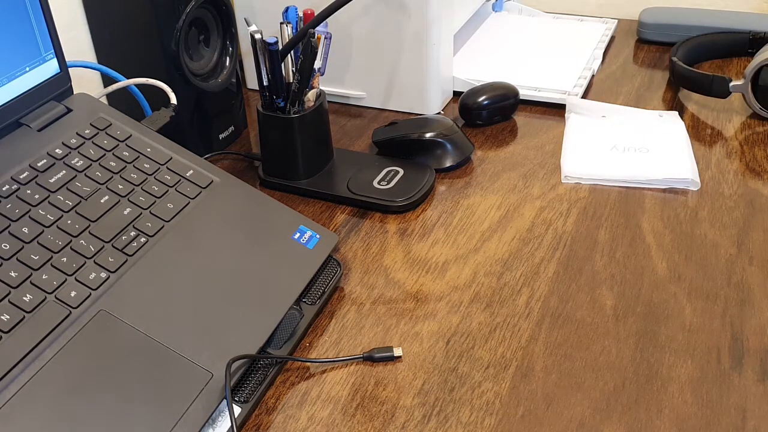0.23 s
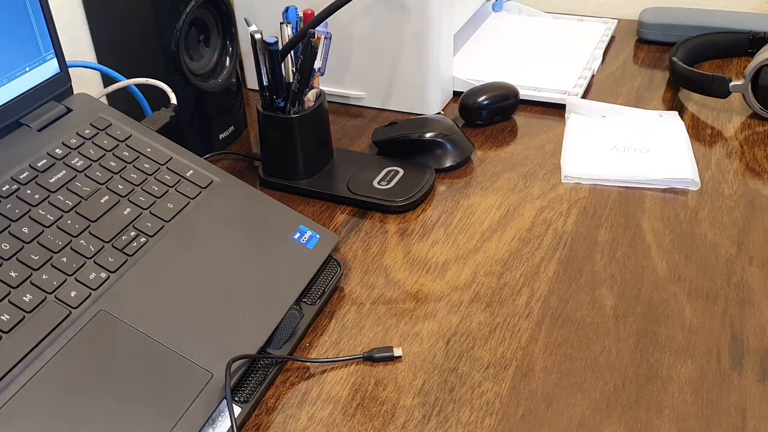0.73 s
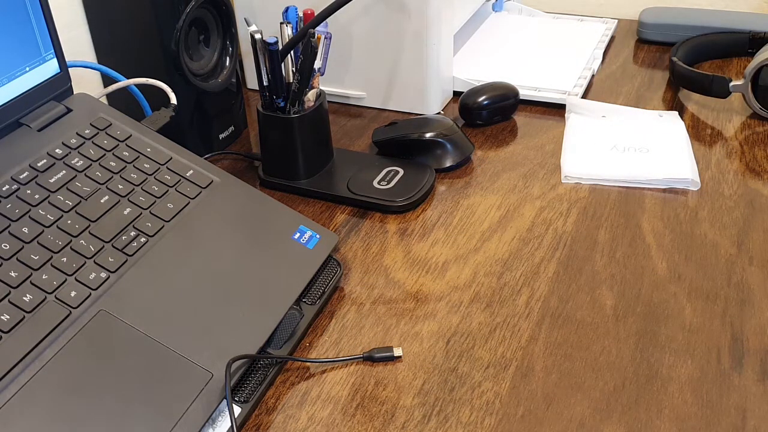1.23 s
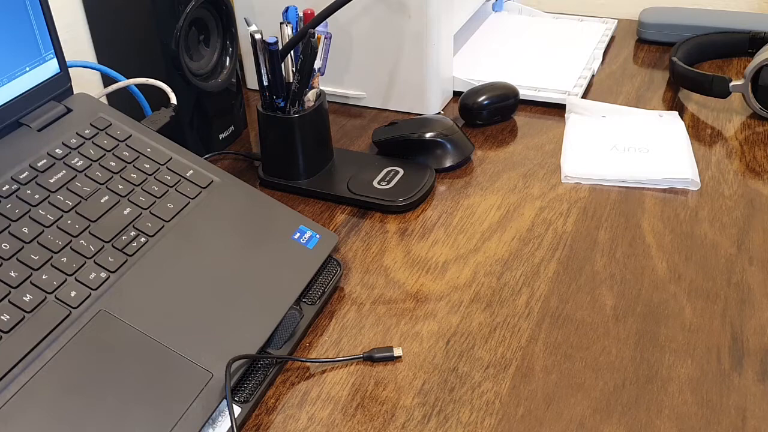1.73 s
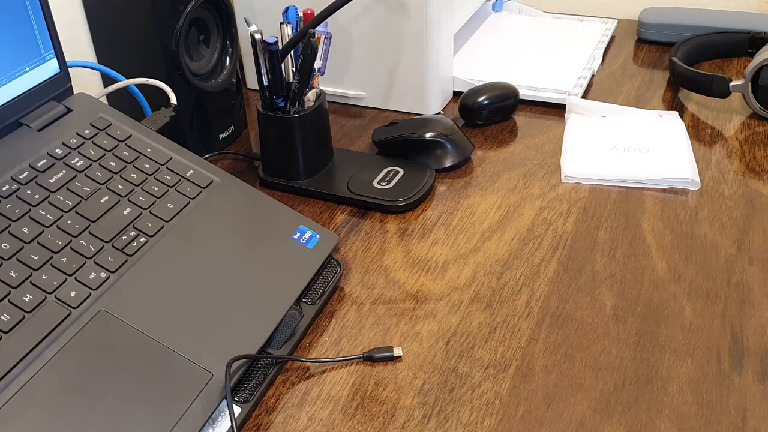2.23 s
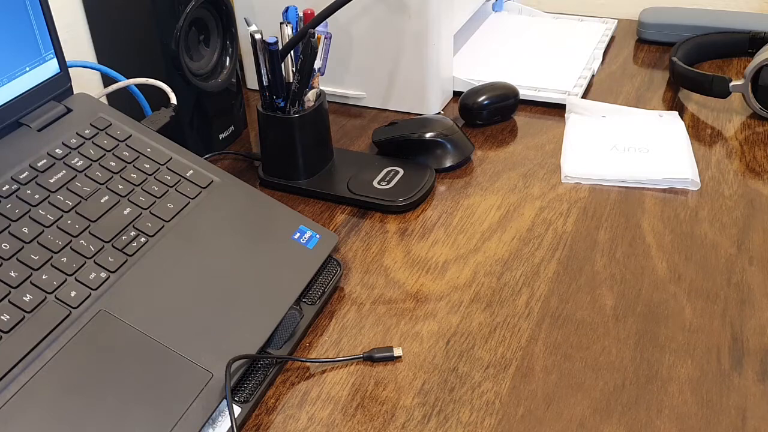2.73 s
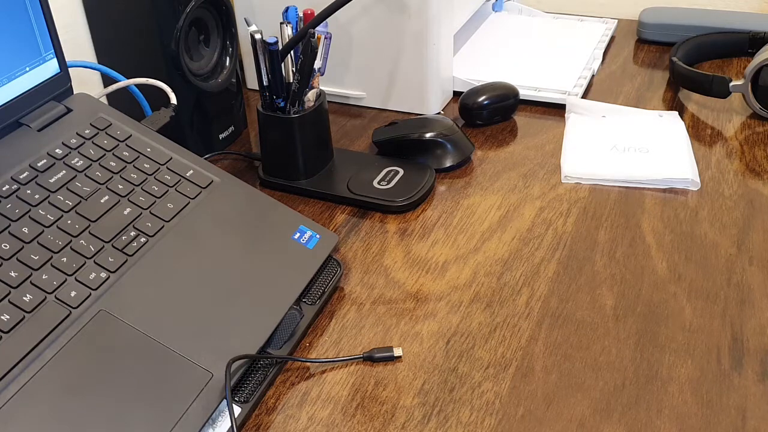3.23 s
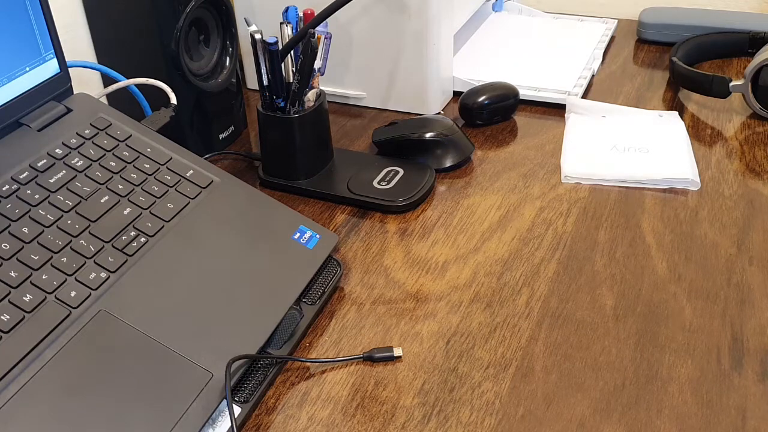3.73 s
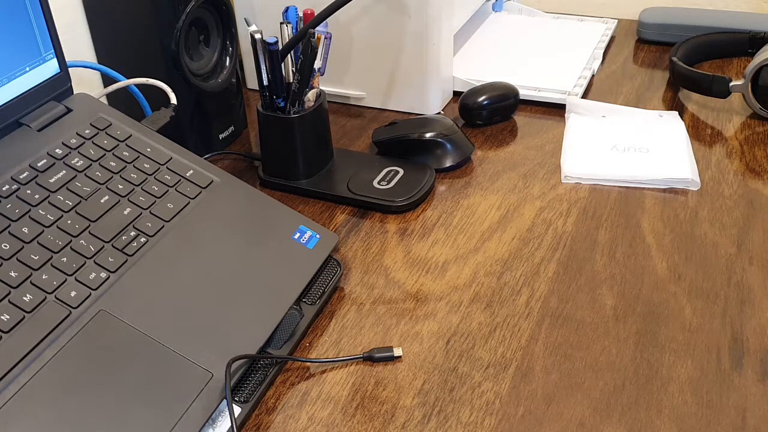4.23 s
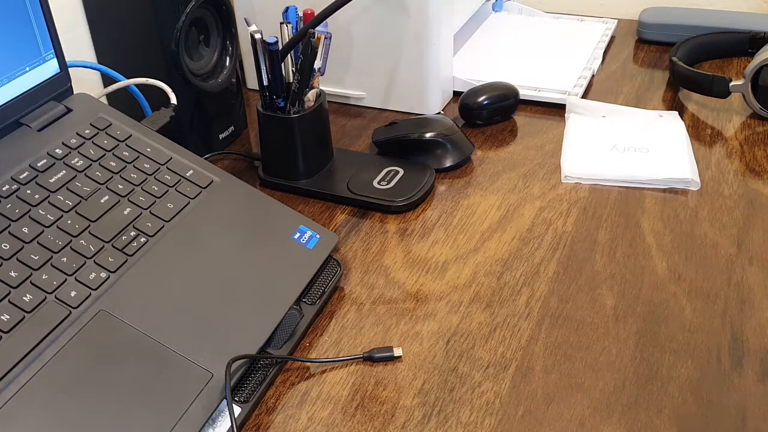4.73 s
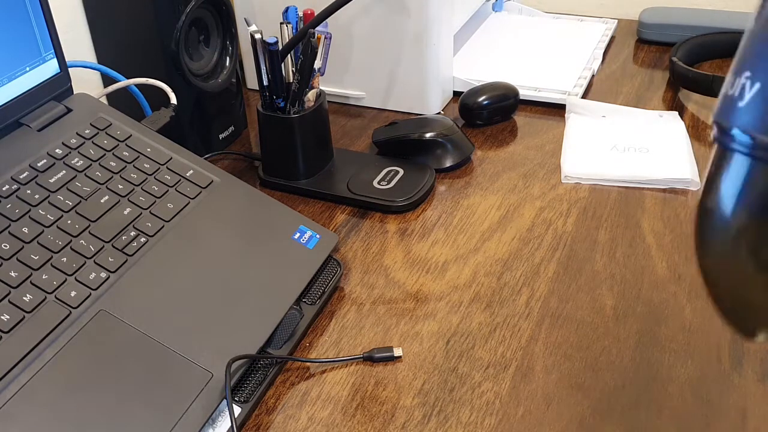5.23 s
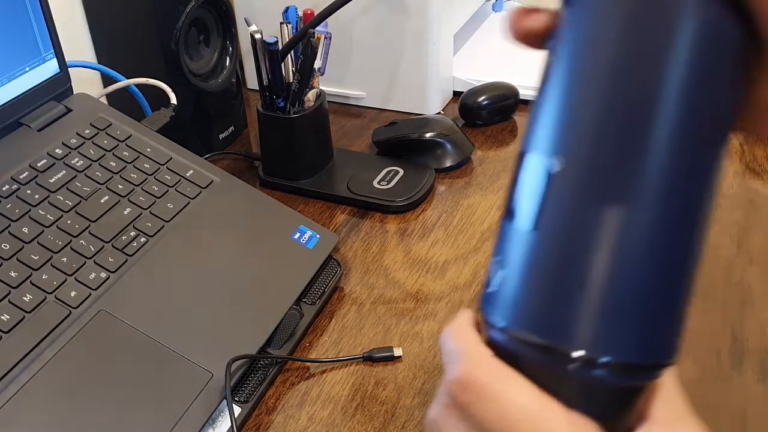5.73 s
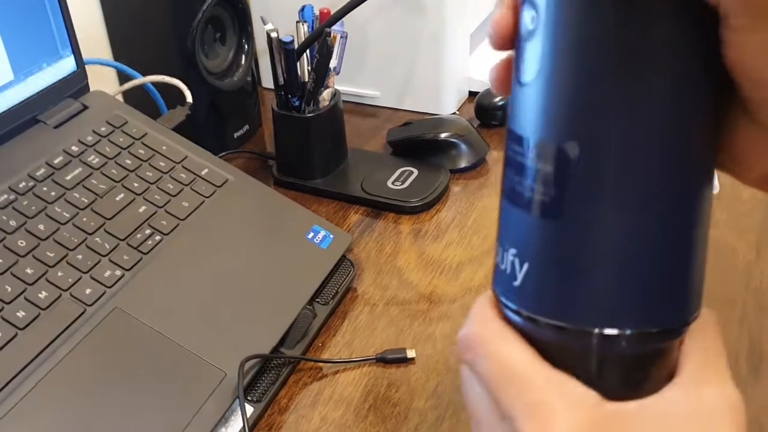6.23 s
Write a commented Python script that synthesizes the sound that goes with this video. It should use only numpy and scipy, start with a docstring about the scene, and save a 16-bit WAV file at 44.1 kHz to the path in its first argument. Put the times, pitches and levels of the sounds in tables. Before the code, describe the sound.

Falling whir of a handheld vacuum coasting to a stop in a quiet room, followed by grip rustles, creaks, soft thuds and a sharp plastic snap.

```python
"""A small cordless vacuum, just switched off, coasts to a stop beside a phone on a wooden desk in a quiet room.
Rotor harmonics glide down through fixed housing resonances, over filtered noise that dies away with the speed.
A faint tick follows the stop; then the slipping grip ticks in noise bursts and sliding hands rustle in grains.
As it is picked up, decaying modes make the shell creak, the dust cup joint click, the desk thud dully and
the catch snap."""
import sys
import numpy as np
from scipy import signal
from scipy.fft import rfft, irfft, next_fast_len
from scipy.io import wavfile

SR = 44100
rng = np.random.default_rng(int(sys.argv[2]) if len(sys.argv) > 2 else 0)


def waveform_to_disk(signal):
    """Save audio, clipped to [-1, 1], as 16-bit WAV at the path in sys.argv[1]."""
    frames = np.transpose(np.atleast_2d(signal))
    scaled = np.clip(frames, -1, 1) * 32767
    samples = np.round(scaled).astype(np.int16)
    wavfile.write(sys.argv[1], SR, samples)


N = 285768
T = np.arange(N) / SR

START_HZ = 313.46  # turns per second at the start
TOP_HZ = 15900  # upper band limit
FLOOR_DB = -69.5  # rms level of the background

# Spectrum of friction hiss. Each row: frequency in Hz, level in dB.
FRICTION_HISS = [(1760, -61), (3000, -40), (3260, -3.5), (4600, -6.5), (5800, -1), (6760, -1.5),
                 (7560, -9.5), (8520, -3.5), (9870, 2), (11500, -3), (13200, 3), (15100, -5), (16000, -0.5)]


def undb(db):
    """Convert decibels to an amplitude ratio by the logarithmic law."""
    return 10 ** (np.asarray(db) / 20)


def unit(x):
    """Normalize mean power: scale to rms 1."""
    return x / np.sqrt(np.mean(x ** 2))


def colour(x, points):
    """Linear filtering: shape a spectrum by (Hz, dB) points, joined on a logarithmic frequency axis."""
    hz, db = np.transpose(points)
    size = next_fast_len(x.shape[-1] + 4096)
    f = np.maximum(np.arange(size // 2 + 1) * SR / size, 1)
    low_cut = f / np.hypot(f, hz[0] / 2)
    gain = undb(np.interp(np.log(f), np.log(hz), db)) * low_cut
    return irfft(rfft(x, size) * gain, size)[..., :x.shape[-1]]


def resonate(x, hz, width_hz):
    """A single damped resonance, with gain 1 at its centre."""
    return signal.lfilter(*signal.iirpeak(hz, hz / width_hz, fs=SR), x)


def walk(rate, clock=T):
    """Random modulation: normal values, rate of them per clock unit, joined by straight lines."""
    steps = rng.standard_normal(8192)
    return 1.2 * np.interp(clock * rate, np.arange(len(steps)), steps)


def swell(s, rise_s, fall_s):
    """Growth and decay of a contact force about its firmest moment s."""
    shape = 1.55  # 1 = pointed, 2 = rounded
    return np.exp(-np.maximum((s - T) / rise_s, (T - s) / fall_s) ** shape)


def add(track, s, sound):
    """Superposition: mix a sound in at a time in seconds."""
    i = max(int(s * SR), 0)
    track[i:i + len(sound)] += sound[:max(N - i, 0)]


def spread(a, b, lag_ms, corner_hz):
    """Coherence of a broad source: the ports share its lows, the right one first, and differ in its highs."""
    low = signal.butter(2, corner_hz, fs=SR, output="sos")
    high = signal.butter(2, corner_hz, "high", fs=SR, output="sos")
    shared = signal.sosfilt(low, a)
    delayed = np.roll(shared, int(lag_ms * SR / 1000))
    return np.array([delayed, shared]) + signal.sosfilt(high, b)


def ports(x, lag_ms):
    """Phase difference: the left port lags, in the treble by a constant three quarters of a cycle."""
    size = next_fast_len(N + 4096)
    f = np.arange(size // 2 + 1) * SR / size
    phase = np.minimum(2 * np.pi * f * lag_ms / 1000, 1.5 * np.pi)
    return np.array([irfft(rfft(x, size) * np.exp(-1j * phase), size)[:N], x])


def room(x, lag_ms, near_db, tail_db, pan_db=0, direct=1):
    """Convolution: direct sound, right port first, then each port's own desk reflections and room tail."""
    t = T[:SR // 2]
    early = rng.standard_normal((2, len(t))) * np.exp(-t / 0.0066) * (t > .0007)
    late = rng.standard_normal((2, len(t))) * (1 - np.exp(-t / 0.0027))
    dull = signal.sosfilt(signal.butter(1, 4500, fs=SR, output="sos"), late)
    # the treble of the tail decays faster: t60 0.18 s against 0.31 s
    late = dull * undb(-60 * t / 0.31) + (late - dull) * undb(-60 * t / 0.18)
    response = (undb(near_db) * unit(early) + undb(tail_db) * unit(late)) / np.sqrt(len(t))
    response[0, int(abs(lag_ms) * SR / 1000)] += direct
    response[1, 0] += direct
    wet = signal.fftconvolve(np.atleast_2d(x), response, axes=1)[:, :N]
    return wet * undb(np.array([[1], [-1]]) * pan_db / 2)


def background():
    """Stationary noise: low room rumble, shared by both ports, under a thin steady hiss."""
    # Spectrum of the quiet room. Each row: frequency in Hz, relative level in dB.
    floor = [(25, -36.5), (55, 10.5), (110, 6.5), (170, 10), (230, -4.5), (300, 6), (450, -8), (1000, -7),
             (2500, -9), (4000, -9.5), (5100, 7.5), (6200, -7.5), (7500, -21), (16000, -22.5)]
    shared = signal.sosfilt(signal.butter(1, 600, fs=SR, output="sos"), rng.standard_normal(N))
    noise = rng.standard_normal((2, N))
    own = signal.sosfilt(signal.butter(1, 500, "high", fs=SR, output="sos"), noise)
    return undb(FLOOR_DB) * unit(colour(shared + own + 0.011 * noise[::-1], floor))


def speed():
    """Equation of motion: turns per second of a rotor braked by friction, grease and air drag, down to rest."""
    friction = 87.63  # dry friction, Hz lost per second
    grease_drag, air_drag = .0586, .001108  # the same loss per Hz, and per Hz squared
    offset_hz = grease_drag / (2 * air_drag)
    scale_hz = np.sqrt(friction / air_drag - offset_hz ** 2)
    angle = np.arctan((START_HZ + offset_hz) / scale_hz) - air_drag * scale_hz * T
    return np.maximum(scale_hz * np.tan(np.maximum(angle, 0)) - offset_hz, 0)


def whine(hz, turn):
    """Source and filter: the rotor orders sweep down through the fixed resonances of the housing."""
    # Strong orders, all multiples of the three armature poles.
    # Each row: multiple of the rotation, relative level in dB.
    strong_orders = [(9, 8), (12, 1), (15, 2), (18, 0), (21, -4), (24, -1), (27, 7), (30, 3), (33, 7),
                     (36, 1), (39, 3), (42, 4), (45, 5), (48, 5), (51, 7), (57, 5), (63, 10)]
    # Weak orders in between. Each row: multiple of the rotation, relative level in dB.
    weak_orders = [(1, -40), (4, -16), (14, -11), (22, -12), (29, 0), (36, -4), (46, 2), (58, 4), (80, 6),
                   (140, 5)]
    # Radiation of the housing. Each row: frequency in Hz, gain in dB.
    housing = [(600, -24), (1000, -14), (1270, -3), (1420, 6), (1580, -3), (1850, -1), (2200, -17),
               (2500, -10), (2800, -4), (3150, -7), (3500, 0), (3800, -2), (4200, 4), (4600, 1), (5000, -7),
               (5400, -1.5), (5900, -3.5), (6400, -10), (7100, -11), (7900, -28), (9000, -14), (10300, -11),
               (11500, -16), (13000, -21), (15000, -32)]
    # Strength of the orders against speed. Each row: turns per second in Hz, gain in dB.
    speed_gain = [(1, -120), (40, -91), (77, -75), (105, -67), (130, -61), (155, -58.5), (179, -55.5),
                  (238, -48), (313, -46)]
    count = int(2.55 * SR)  # just past standstill
    strong = {round(k): db for k, db in strong_orders}
    # turbulent air makes the lines flutter
    flutter = [undb(3.9 * walk(30))[:count] for _ in range(7)]
    spin = np.exp(1j * turn[:count])
    wave, lines = np.ones(count, complex), np.zeros(N)
    for k, angle in enumerate(rng.uniform(0, 2 * np.pi, 140), 1):
        wave = wave * spin  # phasor of order k
        db = strong.get(k, np.interp(k, *np.transpose(weak_orders)))
        line = (wave * np.exp(1j * angle)).real * (k * hz[:count] < TOP_HZ)
        lines[:count] += undb(db) * flutter[k % len(flutter)] * line
    tone = np.sqrt(2) * colour(lines, housing) * undb(np.interp(hz, *np.transpose(speed_gain)))
    # reflections off the desk make each line swell and fade as it glides
    return room(ports(tone, lag_ms=.23), lag_ms=0, near_db=-12, tail_db=-13, direct=.84)


def imbalance_hum(hz, turn):
    """Rotating imbalance: a sinusoid at the rotation rate, stronger in the right port."""
    # Hum against speed. Each row: turns per second in Hz, mean level of the two ports in dB.
    hum_level = [(60, -105), (148, -70), (186, -54), (240, -38), (313, -40)]
    level = undb(np.interp(hz, *np.transpose(hum_level)))
    return np.sqrt(2) * np.sin(turn) * level * undb([[-2.5], [2.5]])


def rushing(hz, turn):
    """Flow and friction noise follow power laws of speed: air rush dies away first, brush scrape later."""
    # Spectrum of the air rush. Each row: frequency in Hz, relative level in dB.
    air_colour = [(75, -13.5), (150, -18), (400, -9), (900, -2), (1250, -9), (1700, -6), (2600, -5.5),
                  (4400, -5), (5500, -29), (6700, -9.5), (8000, -25.5), (10300, -28), (13000, -17),
                  (16000, -31.5)]
    # Spectrum of the brush scrape. Each row: frequency in Hz, relative level in dB.
    brush_colour = [(300, -7), (1400, -9), (2300, -17), (3300, -9), (4400, 4.5), (5200, -9.5), (5900, -9.5),
                    (6800, -13), (7800, -15.5), (9800, -9.5), (13000, -14.5), (16000, -27)]
    rush = undb(-33) * (hz / START_HZ) ** 2.87
    # the scrape grows with speed and levels off above a knee at 158 turns per second
    scrape = undb(-48) * (hz / np.hypot(hz, 158)) ** 1.34
    brushes = unit(colour(rng.standard_normal((2, N)), brush_colour)) * (1 + 0.41 * np.cos(turn)) * scrape
    air = spread(rng.standard_normal(N), rng.standard_normal((2, N)), lag_ms=0.27, corner_hz=1570)
    flow = brushes + unit(colour(air, air_colour)) * rush * undb(1.0 * walk(24.7))
    # the share of treble follows the speed
    treble = signal.sosfiltfilt(signal.butter(2, 7500, "high", fs=SR, output="sos"), flow)
    flow += treble * (undb(np.interp(hz, [60, 160, 260], [-3, -1, 0])) - 1)
    # the brushes drag once more as the rotor comes to rest
    hiss = unit(colour(rng.standard_normal((2, N)), FRICTION_HISS))
    return flow + undb(-67.5) * swell(2.37, rise_s=0.11, fall_s=0.044) * hiss


def churning(hz):
    """Modulated carrier: impeller eddies form a rough band near the third order, narrowing as it slows."""
    # Centre of the band against speed. Each row: turns per second in Hz, multiple of the rotation.
    band_order = [(130, 3.02), (200, 2.9), (300, 2.8)]
    centre_hz = hz * np.interp(hz, *np.transpose(band_order))
    carrier = np.exp(2j * np.pi * np.cumsum(centre_hz) / SR)
    clock = np.cumsum(np.sqrt(hz / START_HZ)) / SR
    eddy = lambda rate: walk(rate, clock) + 1j * walk(rate, clock)
    eddies = unit(((eddy(150) + 0.79 * eddy(370)) * carrier).real)
    eddies *= undb(-37) * (hz / START_HZ) ** 2.92 * np.minimum(hz / 110, 1) ** 4
    # the band swells as it passes the hollow of the body
    eddies += resonate(eddies, 220, 50)
    return room(eddies, lag_ms=0.24, near_db=-19.5, tail_db=-7.5, pan_db=1.0)


def singing(hz, turn):
    """Forced resonance: a lightly damped motor part sings as pole orders cross its pitch, then rings on."""
    # Two decays of the part. Each row: resonance width in Hz, relative level in dB.
    decays = [(5, 0), (1.2, -5)]
    # Pole orders that drive it. Each row: multiple of the rotation, level in dB.
    pole_orders = [(6, -41), (12, -43.5), (15, -62), (18, -50), (21, -60), (24, -58), (30, -59), (36, -60)]
    drive = sum(undb(db) * np.cos(round(k) * turn) for k, db in pole_orders) * (hz > 20)
    return sum(undb(db) * resonate(drive, 842, width_hz) for width_hz, db in decays)


def motor():
    """Common kinematics: one falling speed drives whine, imbalance hum, air, brushes and the singing part."""
    hz = speed()
    turn = 2 * np.pi * np.cumsum(hz) / SR
    return whine(hz, turn) + imbalance_hum(hz, turn) + rushing(hz, turn) + churning(hz) + singing(hz, turn)


def strike(modes, centre_hz, below_db, above_db, crack_db, crack_s):
    """Modal impact: decaying modes and a brief noise crack, both falling off per octave about a centre."""
    t = T[:SR // 3]

    def emphasis(hz):
        """Spectral slope in dB on either side of the centre."""
        octaves = np.log2(hz / centre_hz)
        return np.minimum(below_db * octaves, -above_db * octaves)

    ring = np.zeros(len(t))
    for hz, t60, db in modes:
        weight = undb(db + emphasis(hz)) / np.sqrt(t60) * rng.choice([-1, 1])
        detuned_hz = hz * (1 + 0.0069 * rng.standard_normal())
        ring += weight * np.sin(2 * np.pi * detuned_hz * t) * undb(-60 * t / t60)
    crack_hz = np.geomspace(modes[0][0], modes[-1][0], len(modes))
    density = [(hz, emphasis(hz) - 10 * np.log10(hz)) for hz in crack_hz]
    density.append((4 * density[-1][0], density[-1][1] - 30))
    # the crack peaks just after first contact
    burst = rng.standard_normal(len(t)) * np.exp(-t / crack_s) * (t > .0004)
    crack = colour(burst, density)
    blow = ring / np.abs(ring).max() + undb(crack_db) * crack / np.abs(crack).max()
    return blow / np.abs(blow).max()


def blows(modes, events, crack_db, crack_s):
    """Repeated impulsive excitation of one plastic part, each blow set by its rms over the first 10 ms."""
    out = np.zeros(N)
    for s, db, hz, below_db, above_db in events:
        blow = strike(modes, hz, below_db, above_db, crack_db, crack_s)
        add(out, s, undb(db) * blow / blow[:SR // 100].std())
    return out


def stop_tick_and_joint_clicks():
    """Modal ringing: a faint tick just after the rotor stops, then the dust cup joint clicks twice."""
    # Modes of the joint. Each row: frequency in Hz, t60 in seconds, relative level in dB.
    joint_modes = [(820, 0.008, -17), (1200, 0.01, -9), (1600, 0.006, -11), (2480, 0.012, -7),
                   (2950, 0.008, -9), (3580, 0.011, 0), (4050, 0.009, -1), (4450, 0.008, -3),
                   (5400, 0.004, -7), (6700, 0.004, -6), (12000, 0.002, -8)]
    # The tick, then the two clicks as the joint takes the load.
    # Each row: start in seconds, level of the first 10 ms ahead of the room in dB, strongest frequency in Hz,
    # roll-off below it and above it in dB per octave.
    click_events = [(2.609, -67, 2500, 14, 16), (4.2118, -39.5, 3790, 12, 4),
                    (4.7104, -42, 3500, 0.47, 1.5)]
    dry_clicks = blows(joint_modes, click_events, crack_db=-8, crack_s=0.0011)
    return room(dry_clicks, lag_ms=.04, near_db=-11, tail_db=-3.5)


def strokes():
    """Friction excitation: how strongly sliding hands hiss, rasp the shell and sound its hollow over time."""
    # Each row: firmest moment, rise and fall in seconds, then levels of hiss, shell and hollow body in dB,
    # ahead of the room.
    stroke_rows = [ (2.995, 0.033, 0.051, -59, -77, -98), (3.061, 0.0047, 0.016, -58, -86, -91),
                   (3.12, 0.044, 0.11, -45, -66, -85), (3.19, 0.025, 0.76, -65.5, -89, -88),
                   (3.724, 0.037, 0.067, -44, -62.5, -69.5), (3.824, 0.063, 0.054, -36.5, -46.5, -81),
                   (3.89, 0.037, 0.1, -49.5, -72, -63), (4.059, 0.0097, 0.013, -50, -71, -78),
                   (4.2, 0.043, 0.18, -65.5, -65, -74), (4.425, 0.04, 0.026, -58, -71, -73),
                   (4.507, 0.041, 0.055, -41, -58, -79.5), (4.615, 0.086, 0.037, -57.5, -68.5, -75),
                   (4.83, 0.27, 0.32, -54.5, -61, -79.5), (5.03, 0.044, 0.072, -42.5, -62.5, -66.5),
                   (5.064, 0.026, 0.026, -28.5, -39.5, -57), (5.147, 0.024, 0.039, -32.5, -42.5, -47.5),
                   (5.247, 0.037, 0.052, -32.5, -43.5, -52.5), (5.35, 0.06, 0.057, -43, -52, -62.5),
                   (5.84, 0.085, 0.079, -68, -65.5, -70), (6.2, 0.073, 0.058, -57, -68, -75)]
    return sum(np.outer(undb(levels_db), swell(s, rise_s, fall_s))
               for s, rise_s, fall_s, *levels_db in stroke_rows)


def slips():
    """Stick-slip as a random process: chance ticks as strong as their stroke, up to a limit: (s, dB)."""
    slips_per_s, limit_db = 70, -34
    over_hiss_db, scatter_db = 16, 4
    chance, size = rng.random(N), rng.standard_normal(N)
    hiss = strokes()[0]
    moments = np.flatnonzero((chance < slips_per_s / SR) & (hiss > undb(FLOOR_DB + 3)))
    levels_db = 20 * np.log10(hiss[moments]) + over_hiss_db + scatter_db * size[moments]
    return list(zip(T[moments], np.minimum(levels_db, limit_db)))


def bright_ticks():
    """Impulsive contact: slips of the grip and onsets of clicks and snap, as decaying bright noise bursts."""
    # Bright ticks of the slipping grip, and the bright onsets of the clicks and the snap.
    # Each row: start in seconds, peak level ahead of colouring and room in dB.
    set_ticks = [(2.9373, -37), (2.96, -37), (2.982, -44), (3.0558, -27), (3.0703, -31), (3.096, -23.5),
                 (3.183, -26.5), (3.189, -27), (3.2235, -24.5), (3.228, -32), (3.258, -33), (3.268, -25),
                 (3.295, -37), (3.307, -31), (3.316, -26.5), (3.348, -33), (3.3835, -35), (3.389, -30.5),
                 (3.394, -27.5), (3.5337, -38.5), (3.601, -42.5), (3.6934, -21.5), (3.705, -24),
                 (3.7583, -21), (3.854, -28), (3.909, -21.5), (3.982, -48), (4.047, -31), (4.211, -32),
                 (4.404, -29.5), (4.709, -21.5), (4.825, -41), (5.0074, -17), (5.481, -33), (5.578, -36),
                 (5.64, -46.5), (6.097, -44), (6.209, -45), (6.217, -43), (6.2205, -40), (6.24, -38)]
    # Spectrum of a tick. Each row: frequency in Hz, gain in dB.
    tick_colour = [(2000, -28), (4000, -7), (7500, -7), (9000, 1), (13000, 1.5), (16000, 0)]
    contact, out = rng.standard_normal(N), np.zeros(N)
    for s, db in [*set_ticks, *slips()]:
        tick = contact[int(s * SR):][:600]
        tick = tick * np.exp(-T[:len(tick)] / .0004)
        add(out, s, undb(db) * tick / np.abs(tick).max())
    return room(colour(out, tick_colour), lag_ms=.25, near_db=-7, tail_db=-12)


def wander(x, share, rate):
    """Time warping: the resonances of a sound drift up and down by a share of their pitch."""
    path = np.cumsum(1 + share * walk(rate)) % N
    return np.array([np.interp(path, np.arange(N), port) for port in x])


def rubbing():
    """Stick-slip friction: skin and cloth catch in tiny grains that rasp the shell and sound its hollow."""
    # Spectrum of the rasping shell. Each row: frequency in Hz, relative level in dB.
    rasp_colour = [(400, -30), (750, -10.5), (1000, -9.5), (1450, -2), (1750, 5), (2000, 3), (2300, -1),
                   (2650, 3.5), (3100, -14.5), (6000, -20), (12000, -60)]
    # Short scuffs of a fingertip, the last one the lingering noise after the catch snaps.
    # Each row: start in seconds, length in seconds, resonance in Hz,
    # level of the resonance in dB, level of the hiss in dB, both ahead of the swell and the room.
    scuff_rows = [(4.07, 0.081, 810, -61, -53.5), (4.774, 0.085, 1200, -58.5, -78),
                  (5.766, 0.11, 894, -53, -54.5), (5.828, 0.099, 544, -66, -63),
                  (6.11, 0.084, 700, -67, -50.5)]
    # Balance as the hands move. Each row: time in seconds, left minus right in dB.
    balance = [(3.05, -4), (3.19, -2), (3.4, -7), (3.66, -2), (4.29, 1), (4.81, 0), (4.89, 1), (5.4, 1)]
    hiss, shell, hollow = strokes()
    sizes_db = 1.9 * rng.exponential(size=N).clip(0, 4)
    sizes_db += 2.4 * walk(260).clip(-2, 1.2) + 1.0 * walk(70).clip(-2, 0.7)
    sizes = undb(sizes_db)
    shared, own = rng.standard_normal(N) * sizes, rng.standard_normal((2, N)) * sizes
    grains = unit(spread(shared, own, lag_ms=0.25, corner_hz=2300))
    rasp = undb(-4.0) * unit(colour(grains, rasp_colour))
    rasp += undb(-5.0) * unit(resonate(resonate(grains, 2860, 360), 2890, 472))
    cavity = unit(resonate(resonate(grains, 303, 44), 413, 470))
    # the moving grip shifts the resonances
    sound = unit(colour(grains, FRICTION_HISS)) * hiss
    sound += wander(rasp, share=.05, rate=14) * shell
    sound += wander(cavity, share=.05, rate=9) * hollow
    for s, length, hz, db, hiss_db in scuff_rows:
        age = np.maximum(T - s, 0) / length
        envelope = np.minimum(age / 0.38, 1) * np.exp(-2 * age ** 2)
        body = unit(resonate(resonate(grains, hz, 0.23 * hz), hz, 3.1 * hz))
        bright = unit(resonate(grains, 6500, 21800))
        sound += envelope * (undb(db) * body + undb(hiss_db) * bright)
    wet = room(sound, lag_ms=0, near_db=-18, tail_db=-9)
    return wet * undb(np.array([[.5], [-.5]]) * np.interp(T, *np.transpose(balance)))


def shell_creaks():
    """Modal ringing: the plastic shell creaks under the grip in short blows."""
    # Modes of the shell. Each row: frequency in Hz, t60 in seconds, relative level in dB.
    shell_modes = [(1600, 0.03, 1), (1950, 0.02, -5), (2550, 0.01, -5), (2920, 0.02, 2), (3400, 0.01, -3),
                   (6200, 0.004, -5), (12000, 0.002, -6)]
    # Each row: start in seconds, level of the first 10 ms ahead of the room in dB, strongest frequency in Hz,
    # roll-off below it and above it in dB per octave.
    creak_events = [(3.758, -46.5, 2940, 0.54, 1.1), (3.7639, -52, 2900, 2.6, 0.4),
                    (3.8019, -51.5, 2900, 1.9, 1.4), (3.8258, -48, 2940, 0.48, 2.6),
                    (3.872, -52, 2900, 12, 3.1), (3.8736, -45.5, 2970, 8.9, 2.3)]
    dry_creaks = blows(shell_modes, creak_events, crack_db=-23, crack_s=0.0018)
    return room(dry_creaks, lag_ms=.04, near_db=-13, tail_db=-3.0)


def bumps():
    """Structure-borne sound: soft knocks excite desk modes and reach both ports nearly alike."""
    # Modes of the desk. Each row: frequency in Hz, t60 in seconds, relative level in dB.
    desk_modes = [(47.3, 0.73, 21), (64.8, 0.24, 25.5), (110.4, 0.55, 15.5), (159, 0.26, -3),
                  (188, 0.19, 10), (310, 0.071, 11.5), (368, 0.089, -22), (552, 0.2, 6)]
    # Dull bumps. Each row: start in seconds, peak level ahead of the soft onset and the room in dB,
    # strongest frequency in Hz, roll-off above it in dB per octave.
    bump_events = [(4.54, -35, 110, 5.5), (4.584, -37, 117, 4.5), (5.562, -42, 91.3, 3),
                   (5.631, -47, 119, 4.5), (5.875, -41.5, 54.6, 7), (5.915, -45.5, 55, 2),
                   (5.982, -51, 121, 8), (6.103, -44, 278, 9), (6.118, -39, 330, -1), (6.191, -51, 55, 4),
                   (6.243, -53.5, 168, -1), (6.455, -52.5, 85, 7)]
    out = np.zeros(N)
    for s, db, hz, rolloff_db in bump_events:
        thud = strike(desk_modes, hz, below_db=7.5, above_db=rolloff_db, crack_db=-10.5, crack_s=0.045)
        soft_onset = 1 - np.exp(-T[:len(thud)] / 0.0021)
        add(out, s, undb(db) * thud * soft_onset)
    return room(out, lag_ms=.1, near_db=-25, tail_db=-14, pan_db=-1)


def catch_snaps():
    """Modal ringing: the catch is touched, snaps open, then knocks on its stop."""
    # Modes of the catch. Each row: frequency in Hz, t60 in seconds, relative level in dB.
    catch_modes = [(760, 0.005, 1), (1120, 0.005, 2), (1700, 0.018, 1), (2480, 0.01, 0), (3000, 0.005, -7),
                   (4400, 0.005, -8), (5400, 0.007, -2), (6400, 0.005, -6), (11000, 0.002, -9)]
    # Each row: start in seconds, level of the first 10 ms ahead of the room in dB, strongest frequency in Hz,
    # roll-off below it and above it in dB per octave.
    snap_events = [(5.6402, -65, 1020, 1.4, 2.1), (6.0982, -37, 1750, 0.3, 0.6),
                   (6.1006, -42, 1750, 1.5, 0.4), (6.2423, -47.5, 1180, 31, 7.1)]
    dry_snaps = blows(catch_modes, snap_events, crack_db=-6, crack_s=0.0014)
    return room(dry_snaps, lag_ms=.04, near_db=-12, tail_db=-2.5)


def scene():
    """Superposition: the motor runs down in the quiet room, then the vacuum is picked up."""
    ticking = stop_tick_and_joint_clicks() + bright_ticks()
    handling = rubbing() + shell_creaks() + bumps() + catch_snaps()
    return background() + motor() + ticking + handling


def record(dry):
    """Band limitation: the phone drops the deepest rumble and cuts the top."""
    lean = signal.sosfilt(signal.butter(4, 36, "high", fs=SR, output="sos"), dry)
    return signal.sosfilt(signal.ellip(10, .2, 70, TOP_HZ, fs=SR, output="sos"), lean)


dry = scene()
out = record(dry)
waveform_to_disk(out)
```